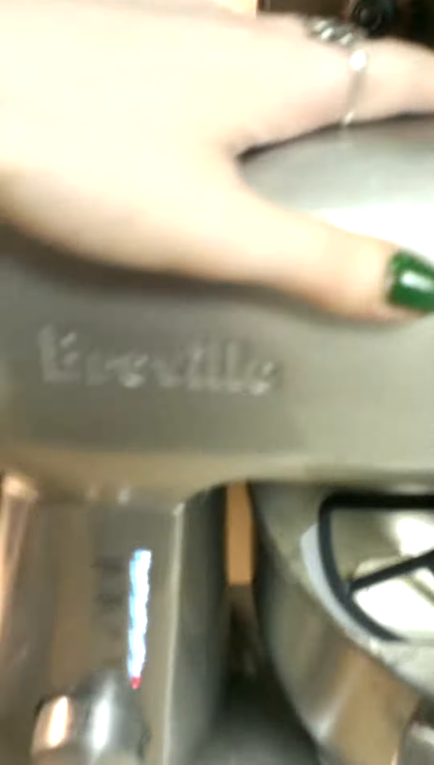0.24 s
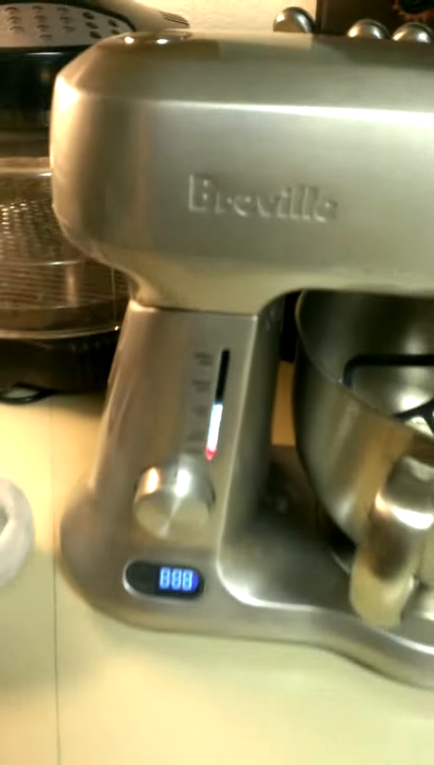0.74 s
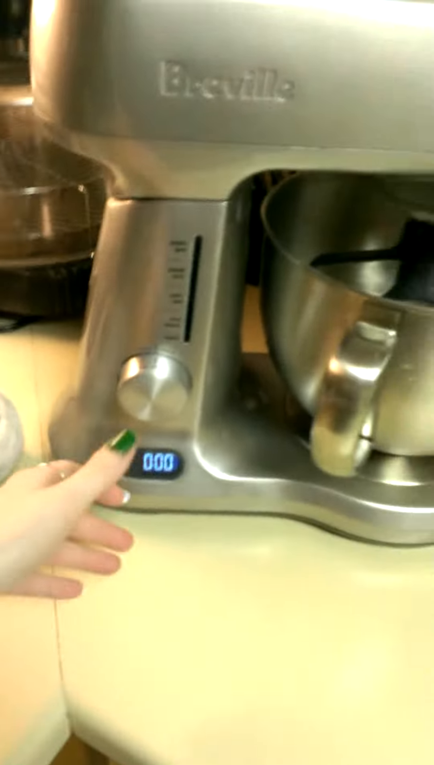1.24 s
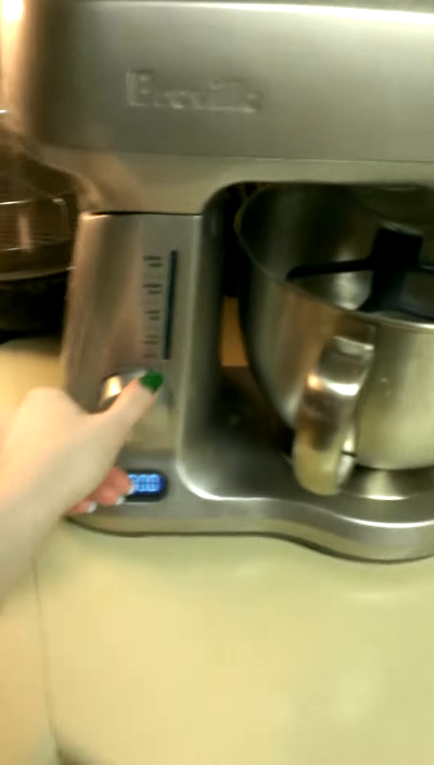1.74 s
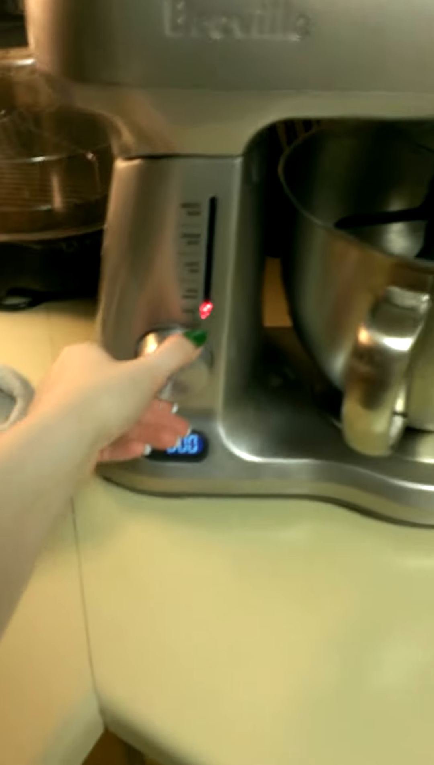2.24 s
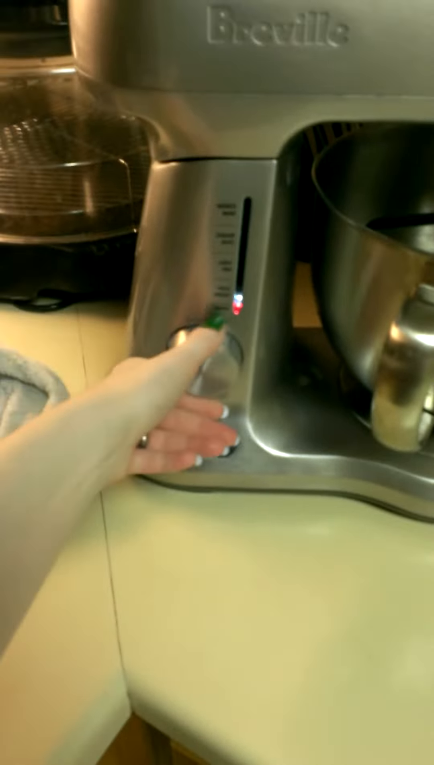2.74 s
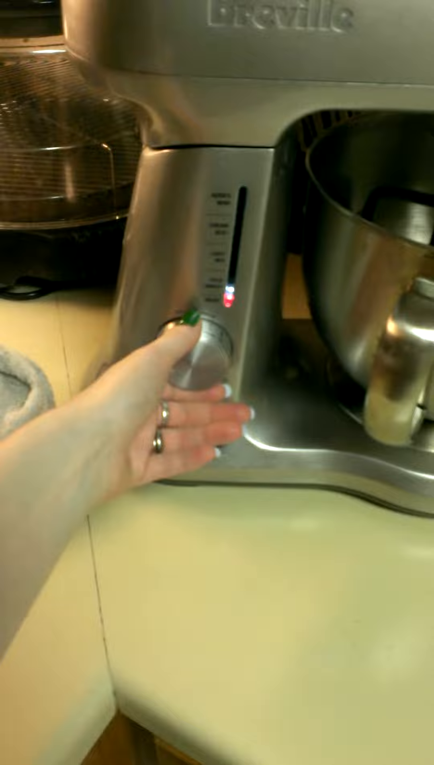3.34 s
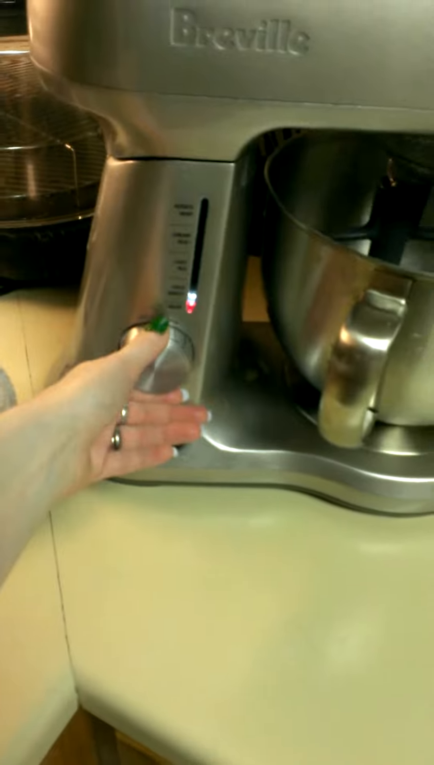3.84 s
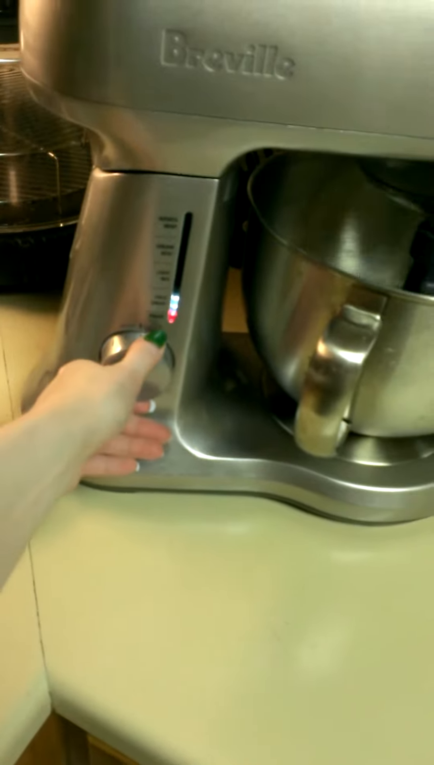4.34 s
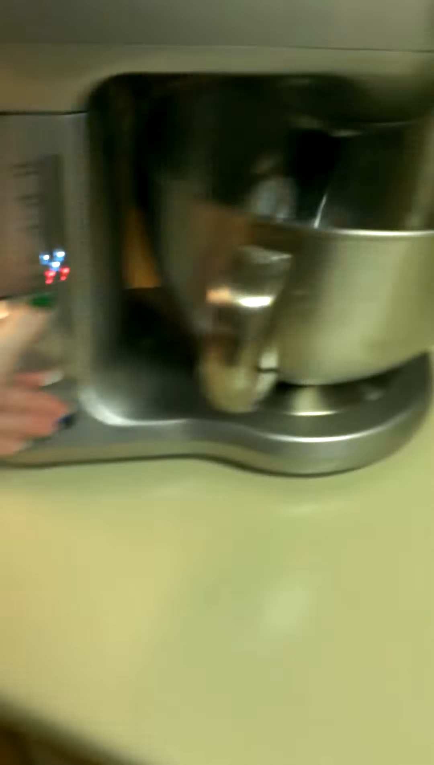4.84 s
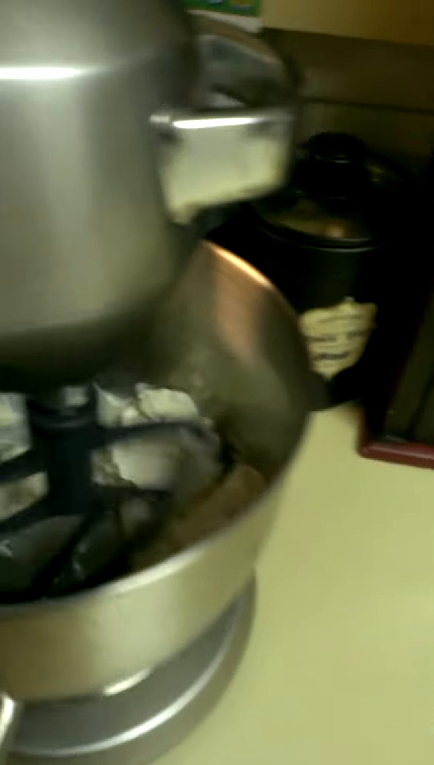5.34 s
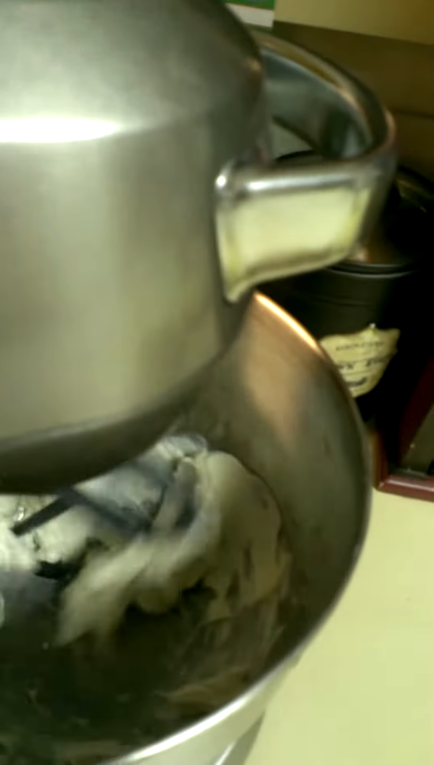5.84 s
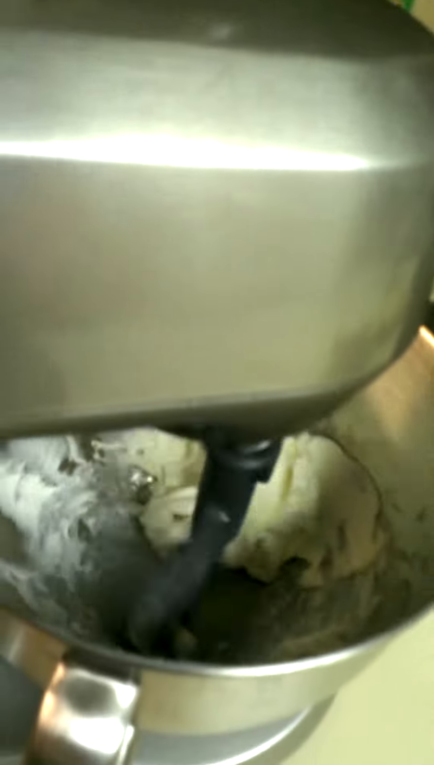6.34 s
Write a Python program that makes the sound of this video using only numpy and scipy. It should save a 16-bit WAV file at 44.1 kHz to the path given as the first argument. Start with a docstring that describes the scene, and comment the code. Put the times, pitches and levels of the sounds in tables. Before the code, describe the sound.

A stand mixer's head latches with a knock, its dial clicks, then the motor hums and whirs, slapping thick mixture around a steel bowl.

```python
"""Stand mixer with a steel bowl

The head latches with a knock and a hand turns the speed dial: impacts that excite damped modes.
The motor starts softly and hums at twice the mains frequency; its gears whirr louder with speed.
The beater churns and slaps a thick mixture and now and then rubs the bowl into resonance.
Two close microphones of unlike response and opposite polarity hear it in a small kitchen."""
import sys
import numpy as np
from scipy import signal
from scipy.fft import rfft, irfft, next_fast_len
from scipy.io import wavfile
from scipy.ndimage import uniform_filter1d

SR = 44100
rng = np.random.default_rng(int(sys.argv[2]) if len(sys.argv) > 2 else 0)


def int16_out(signal):
    """Quantize to a 16-bit WAV file."""
    q = np.round(np.clip(np.atleast_2d(signal).T, -1, 1) * 32767)
    wavfile.write(sys.argv[1], SR, q.astype(np.int16))


N = 290619
T = np.arange(N) / SR
HUM_HZ = 120  # twice the mains frequency
START_S, SPIN_UP_S = 2.82, 1.06  # onset and time constant of the shaft speed

# Levels in all tables are relative; each function sets the gain of its layer.
# gear case resonances, upper and lower: f/Hz, bandwidth/Hz, level/dB
CASE_MODES = [(2490, 270, 2), (2906, 70, 1), (3140, 80, -3), (3330, 130, -1.5), (3580, 80, 1.5)]
WHINE_MODES = [(735.5, 27, -3), (1130, 85, -7.5), (1390.5, 34, -1), (1638, 23, -1.5), (1980, 76, -1)]
# spectrum of the tooth rattle: f/Hz, level/dB
WHIRR_SPECTRUM = [(500, -17.5), (1400, -1), (2150, -17), (2600, 7.5), (3700, -1.5), (4300, -28),
                  (5500, -7.5), (8000, -28)]
def gears(churn_db):
    """Forced vibration: uneven tooth impacts drive the case, whose upper modes flare independently."""
    torque_db = 1.2 * walk(45)
    rattle = undb(2.12 * walk(320) + torque_db) * (1 + 0.048 * np.sin(2 * np.pi * HUM_HZ * T))
    teeth = field() * rattle
    case = unit(sum(resonate(teeth, [(hz, width, 0)]) * undb(db + 2 * walk(23))
                    for hz, width, db in CASE_MODES))
    whirr = undb(-2.5) * colour(field() * rattle, WHIRR_SPECTRUM) + undb(2) * case
    whirr_db = running_db(-43, speed_power=3.5, stroke_db=0.1, swell_share=1)
    return whirr * undb(whirr_db) + undb(churn_db - 0.5) * resonate(teeth, WHINE_MODES)


# spells of gear tone: start t/s, end t/s, f/Hz, level/dB, left minus right/dB, noise share of power
MESH_SPELLS = [(2.85, 4.357, 2008, -4, 13.5, 0.52), (3.497, 4.582, 1419, -3.5, 6.5, 0.54),
               (5.09, 6.7, 1991, 1.5, -5.5, 0.24), (5.65, 6.31, 734, -6, -4.5, .7),
               (5.92, 6.325, 1099, -2.5, 6, 0.65)]
def gear_tones(fade_s=0.061, chatter_hz=27, grit_width_hz=55, right_lag_s=0.00031):
    """Periodic tooth meshing gives wavering, gritty tones; their chatter weakens as the speed rises."""
    chatter_depth = 0.5 * np.sqrt(1 - rise(SPIN_UP_S))
    chatter = 1 + chatter_depth * np.sin(2 * np.pi * chatter_hz * np.cumsum(1 + 0.258 * walk(18)) / SR)
    tones = 0
    for start, end, hz, db, pan_db, rough in MESH_SPELLS:
        gate = np.clip(np.minimum(T - start, end - T) / fade_s, 0, 1)
        mesh_time = np.cumsum(1 + 0.009 * walk(110) + 0.006 * walk(16)) / SR
        tone = np.sqrt(2) * np.sin(2 * np.pi * hz * (mesh_time - np.array([[0], [right_lag_s]])))
        grit = resonate(field(), [(hz, grit_width_hz, 0)])
        grit = resonate(grit, [(hz, 2 * grit_width_hz, 0)])
        blend = np.sqrt(1 - rough) * tone + np.sqrt(rough) * grit
        tones += pan(pan_db) * gate * undb(db + 2 * walk(25)) * blend
    level_db = running_db(-48.5, speed_power=1, stroke_db=0.5, swell_share=0.59)
    current = rise(0.13)
    return tones * chatter * undb(level_db) * current


# hum partials: harmonic number, level/dB, share of each sag, change at full speed/dB
HUM_PARTIALS = [(1, -45, 0.52, 0), (2, -42.5, 1.0, .5), (3, -57, 0.41, 0.5), (4, -54.5, 0.73, -5.5),
                (6, -49, 0.85, -4), (7, -57.5, .5, -0.5)]
# the hum sags as the beater breaks free of the mixture: t/s, level/dB
HUM_SAGS = [(3.78, -4), (4.13, -6), (4.41, -15), (4.82, -3), (5.15, -5), (5.37, -26), (5.61, -3),
            (6.06, -1.5), (6.43, -13)]
def motor(waver_db=2.5, waver_rad=0.21, sag_half_s=0.04):
    """Magnetic forces of chopped mains current make the windings hum; partials waver more with speed."""
    speed, hum = rise(SPIN_UP_S), 0
    sag_db = sum(db * np.exp(-((T - t) / sag_half_s) ** 2) for t, db in HUM_SAGS)
    for k, db, sag_share, fast_db in HUM_PARTIALS:
        phase = 2 * np.pi * (k * HUM_HZ * T + rng.random()) + waver_rad * speed * walk(10)
        partial_db = db + sag_share * sag_db + speed * (fast_db + waver_db * walk(15))
        hum += undb(partial_db) * np.sin(phase)
    level_db = running_db(0.21, speed_power=0.096, stroke_db=0.13, swell_share=0.25)
    return np.sqrt(2) * hum * rise(0.31, start_s=2.7) * undb(level_db)


# spectrum of the churning: f/Hz, level/dB
CHURN_SPECTRUM = [(40, -37.5), (90, -2), (140, 8.5), (195, 0), (280, 2.5), (400, -3.5), (600, -2), (830, 1),
                  (1100, -5.5), (1400, -1), (2200, -2), (4000, -25.5)]
def churning(churn_db):
    """Unsteady viscous flow round the beater radiates low, fluctuating noise."""
    return colour(field(), CHURN_SPECTRUM) * undb(churn_db + 4 + 2 * walk(120))


# the mixture tears off the wall, and air pockets pop: t/s, level/dB
TEARS = [(4.95, -39.5), (5.74, -40.5), (6.22, -47)]
POPS = [(3.683, -36), (4.054, -32.5), (4.122, -35), (4.987, -26), (5.163, -29.5), (5.453, -35),
        (5.7666, -28), (5.805, -19.5), (5.8903, -24.5), (6.132, -23), (6.2196, -24), (6.247, -24),
        (6.5529, -28)]
# spectrum of both: f/Hz, level/dB
CRACKLE_SPECTRUM = [(1000, -46), (4500, 0.5), (7000, 6), (11000, 1.5)]
def crackling():
    """Rupture of sticky mixture and of air pockets releases bright bursts of noise."""
    running = undb(running_db(-49, speed_power=1.5, stroke_db=1.4, swell_share=0.2))
    tears = envelope((t, db, 0.036, 0.19) for t, db in TEARS)
    grain = unit(field() * undb(0.76 * walk(740) + 1.95 * walk(70)))
    pops = field() * envelope((t, db, 0.001, 0.026) for t, db in POPS)
    return colour(undb(6) * (running + tears) * grain + undb(0.5) * pops, CRACKLE_SPECTRUM)


# the beater slaps the mixture on the wall: t/s, smack level/dB, thud level/dB, smack T60/s
SLAPS = [(3.64, -39, -47.5, 0.084), (4.003, -58, -46.5, 0.063), (4.275, -39, -42.5, 0.2),
         (4.604, -42, -59, 0.2), (4.97, -34, -62, 0.09), (5.256, -29, -39.5, 0.068),
         (5.386, -52, -41.5, 0.028), (5.548, -30, -42, 0.048), (5.712, -36, -60, 0.025),
         (5.859, -44, -47, 0.032), (5.996, -35, -43.5, 0.16), (6.128, -32.5, -42.5, 0.18),
         (6.285, -33, -40.5, .12), (6.55, -48, -42.5, .1)]
# spectra of a wet smack and a soft thud: f/Hz, level/dB
SMACK_SPECTRUM = [(100, -13), (700, -5.5), (1600, -2), (3000, -0.5), (3900, 1), (4550, -6), (5500, -3.5),
                  (7500, -9), (11000, -15)]
THUD_SPECTRUM = [(50, -24), (100, -31), (145, -4.5), (195, -16), (270, -17.5), (380, -22.5), (800, -19.5),
                 (1800, -26.5), (5000, -64)]
def slaps():
    """Inelastic impact of a soft mass gives a bright smack and a slower, low thud."""
    smack = envelope((t, db + 4.5, 0.004, t60) for t, db, _, t60 in SLAPS) * undb(2 * walk(400))
    thud = envelope((t, db + 7, 0.016, 1.5 * t60) for t, _, db, t60 in SLAPS)
    return smack * colour(field(), SMACK_SPECTRUM) + thud * colour(field(), THUD_SPECTRUM)


# hollows close in the mixture: t/s, level/dB, initial f/Hz
PLOPS = [(3.622, -37, 684), (4.0, -38.5, 506), (4.05, -39, 311), (4.275, -30, 256.7), (5.25, -29, 461),
         (5.258, -35, 280.4), (5.277, -32, 155), (5.58, -30.5, 290), (5.85, -34, 496), (5.99, -39, 312),
         (6.139, -31.5, 157.5), (6.142, -34, 460), (6.278, -30, 304.4), (6.545, -28, 729)]
def plops(fall_per_s=2.3):
    """Cavity resonance: each closing hollow sounds a damped tone that sinks in pitch."""
    tones = 0
    for t, db, hz in PLOPS:
        sinking = np.exp(-fall_per_s * np.clip(T - t, 0, 1))
        phase = 2 * np.pi * (hz * np.cumsum(sinking) / SR + rng.random())
        tones += envelope([(t, db, 0.011, 0.08)]) * np.sin(phase)
    return tones * undb(2 * walk(200))


# the beater smears the mixture: t/s, level/dB, rise/s, T60/s
SMEARS = [(5.2, -37, 0.042, 0.23), (5.33, -36, 0.017, 0.099), (5.465, -33.5, 0.012, 0.085),
          (5.6, -44, 0.021, .12), (5.68, -33, 0.031, .08), (5.79, -31.5, 0.033, 0.2),
          (6.09, -32, 0.049, .13), (6.44, -31, 0.014, 0.14)]
# resonances of the smear: f/Hz, bandwidth/Hz, level/dB
SMEAR_MODES = [(2850, 120, 6), (3150, 80, 3), (3450, 140, -3), (3570, 110, 3)]
def smears():
    """Stick-slip friction of wet mixture along the wall makes an uneven rasp."""
    return resonate(field(), SMEAR_MODES) * envelope(SMEARS) * undb(2.5 * walk(160))


# the beater jolts on its shaft: t/s, level/dB, T60/s
JOLTS = [(3.6415, -32, .018), (3.647, -23.5, 0.029), (4.2941, -19.5, 0.027), (4.608, -34, 0.02),
         (4.939, -28, .03), (5.911, -18.5, 0.019), (6.133, -32, 0.032)]
# beater resonances: f/Hz, bandwidth/Hz, level/dB
BEATER_MODES = [(2640, 270, 0), (3110, 200, -13), (4110, 200, -2), (4460, 170, 3), (4700, 91, -11),
                (8900, 1500, -3.5)]
def beater():
    """Impulsive excitation: each jolt gives the beater a hard, short ring."""
    jolts = envelope((t, db - 3, 0.001, t60) for t, db, t60 in JOLTS)
    return pan(3.1) * resonate(field(), BEATER_MODES) * jolts


# the beater rubs the bowl: t/s, level/dB, contact time/s, T60/s, left minus right/dB
RUBS = [(.008, -41.5, 0.014, 0.19, -4), (4.266, -39.5, 0.011, 0.16, 8), (4.409, -44, 0.028, .3, 4),
        (4.51, -39, 0.028, 0.28, 4), (4.601, -31.5, 0.0069, 0.068, 15), (4.762, -29, 0.018, 0.066, 7.5),
        (5.55, -36, 0.0039, 0.16, -16.5), (5.843, -35, 0.014, 0.11, 6), (6.46, -40, 0.011, 0.1, 6)]
# resonances of the rasp: f/Hz, bandwidth/Hz, level/dB
RASP_MODES = [(1710, 120, 10), (1430, 210, -6), (1860, 510, -9), (2340, 270, 2)]
# the mixture squeaks on the steel: t/s, level/dB, f/Hz, rise/s
SQUEAKS = [(4.135, -51.5, 3340, 0.037), (4.32, -49, 3350, 0.0071)]
# the beater strikes the bowl: t/s, level/dB, knock above ring/dB
STRIKES = [(.007, -40.5, 5), (4.762, -33, 1), (5.3912, -22.5, -5.5)]
# bowl modes, damped by the mixture: f/Hz, level/dB, T60/s
BOWL_MODES = [(1520, -6.5, 0.023), (1656, -1, 0.041), (1920, -13, 0.012), (2522, -1, 0.085)]
# spectrum of the dull knock: f/Hz, level/dB
STRIKE_SPECTRUM = [(300, -8), (700, -18), (1100, -4.5), (1900, -4), (2600, 3), (5000, -33)]
def bowl(rubbed_hz=1617):
    """Uneven friction rasps, squeaks and builds up one bowl mode; an impact excites several."""
    rubbed = sum(ring([(rubbed_hz, 5.5, t60)], [(t, db, contact, pan_db)])
                 for t, db, contact, t60, pan_db in RUBS)
    rasp = resonate(field(), RASP_MODES) * envelope(rub[:4] for rub in RUBS)
    squeaks = sum(ring([(hz, 10, 0.1)], [(t, db, rise_s, 0)]) for t, db, hz, rise_s in SQUEAKS)
    clinks = ring(BOWL_MODES, [(t, db, 0.0015, 4) for t, db, _ in STRIKES])
    blows = envelope((t, db + knock_db, 0.0025, 0.022) for t, db, knock_db in STRIKES)
    knocks = colour(field(), STRIKE_SPECTRUM) * blows
    friction = undb(2 * walk(250))
    return (rubbed + squeaks) * friction + pan(2.8) * undb(0.5) * rasp + clinks + knocks


# the head locks down: t/s, level/dB
LATCH_KNOCKS = [(0.1351, -14.5), (0.1392, -15)]
# spectrum of the latch: f/Hz, level/dB
LATCH_SPECTRUM = [(60, -58), (220, -10), (600, -15), (1100, -7), (1800, 2.5), (2600, -4), (4200, -8),
                  (6000, -9.5), (8800, -7.5), (11000, -23)]
# modes of the cast head: f/Hz, level/dB, T60/s
HEAD_MODES = [(236, -17, 0.15), (330, -16, .1), (480, -18, .11), (755, -9, 0.034), (924, -8, 0.05),
              (1315, 5.5, 0.036), (1654, -4, 0.024), (1836, 6, .03), (1920, 3, .036), (2040, 4, 0.025),
              (2190, 2, .03), (2546, 2, 0.03), (3010, -6, 0.04), (3540, -3, 0.04), (4270, -9, .06),
              (8800, -4, 0.02)]
def head():
    """Free vibration after impact: the latch cracks and rattles, the head rings over a soft thump."""
    crack = colour(field(), LATCH_SPECTRUM) * envelope((t, db, 0.0013, 0.036) for t, db in LATCH_KNOCKS)
    t, db = max(LATCH_KNOCKS, key=lambda knock: knock[1])
    thump = colour(field(), THUD_SPECTRUM) * envelope([(t, db - 24, 0.016, 0.17)])
    rattle = colour(field(), LATCH_SPECTRUM) * envelope([(t, db - 11, 0.012, 0.17)])
    rattle *= undb(2 * walk(300))
    return pan(1.6) * (crack + rattle) + thump + ring(HEAD_MODES, [(t, db - 4.5, 0.0025, 5)])


# fingers and dial detents: t/s, level/dB, treble above body/dB, T60/s
CLICKS = [(0.007, -40, 11, 0.13), (.222, -41, -5, 0.26), (1.194, -51, 5, 0.064), (1.266, -52.5, 3, .05),
          (1.316, -46, 4, 0.035), (1.322, -49, 3.5, 0.44), (1.424, -47, 10, 0.097),
          (1.997, -54, 18.5, 0.31), (2.122, -45, 7.5, 0.49), (2.167, -40, -4, 0.037), (2.25, -48.5, 8, .05),
          (2.302, -47, 8, 0.19), (2.405, -48.5, 0, 0.11), (2.605, -49, 7, 0.36), (2.690, -39, 5, 0.086),
          (3.406, -36.5, -1.5, 0.41)]
# spectra of a click's body and treble: f/Hz, level/dB
CLICK_SPECTRUM = [(100, -14), (600, -4.5), (1500, -4), (2600, -6.5), (3700, 0.5), (4400, -1.5), (5500, -3),
                  (11000, -9.5)]
TREBLE_SPECTRUM = [(2000, -38), (5000, -3.5), (7000, 3), (10000, 1.5)]
def clicks():
    """Brief contacts of fingers and detents radiate broadband transients."""
    body = envelope((t, db, 0.0015, t60) for t, db, _, t60 in CLICKS)
    treble = envelope((t, db + bright_db, 0.001, t60) for t, db, bright_db, t60 in CLICKS)
    bursts = colour(field(), CLICK_SPECTRUM) * body + colour(field(), TREBLE_SPECTRUM) * treble
    return bursts * undb(-3 + 2 * walk(500))


# a fingernail touches the steel: t/s, level/dB
NAIL_TOUCHES = [(1.771, -37)]
# resonances of the steel: f/Hz, bandwidth/Hz, level/dB
STEEL_MODES = [(4730, 240, -16), (6470, 120, -6), (6980, 160, -1), (9700, 260, -15), (9780, 100, 5.5),
               (9700, 160, -4)]
def fingernail():
    """A light, hard contact excites the high modes of the steel."""
    return resonate(field(), STEEL_MODES) * envelope((t, db + 6, 0.001, 0.15) for t, db in NAIL_TOUCHES)


# scuffs and bumps of handling: t/s, level/dB, band f/Hz, rise/s, T60/s
SCUFFS = [(0.534, -47, 1200, 0.014, 0.68), (0.711, -42, 2520, 0.0071, 0.46),
          (1.375, -48.5, 1450, 0.045, 0.38), (1.992, -46.5, 2450, 0.0018, 0.57),
          (2.17, -51.5, 940, 0.02, 0.29), (2.454, -48, 2110, 0.0024, 0.55),
          (3.12, -43.5, 2220, 0.0096, 0.52), (3.411, -42.5, 2320, 0.012, 0.58),
          (3.81, -38.5, 1940, 0.073, 0.54)]
# response of the housing: f/Hz, gain/dB
HOUSING_RESPONSE = [(300, -1), (1900, 1), (2400, 7), (2900, 0.5), (4000, 0), (7000, 0), (11000, 1.5)]
def scuffs():
    """Sliding friction of the hand makes bands of noise, filtered by the resonant housing."""
    rubbing, size = np.zeros((2, N)), SR // 2
    for t, db, hz, rise_s, t60 in SCUFFS:
        bandpass = signal.butter(1, [hz / 1.83, hz * 1.46], "band", fs=SR, output="sos")
        band = unit(signal.sosfilt(bandpass, field(size)))
        first = int(t * SR)
        rubbing[:, first:first + size] += band * envelope([(0.00088, db, rise_s, t60)])[:size]
    return colour(rubbing * undb(2 * walk(300)), HOUSING_RESPONSE, keep_power=False)


# fingers tap the dial and the housing: t/s, level/dB, f/Hz, bandwidth/Hz, T60/s
FINGER_TAPS = [(2.166, -37.5, 3660, 900, 0.028), (2.454, -40.5, 2260, 160, .07)]
def taps():
    """Each tap excites one damped resonance of the knob or the housing."""
    return sum(resonate(field(), [(hz, width, 0)]) * envelope([(t, db, 0.001, t60)])
               for t, db, hz, width, t60 in FINGER_TAPS)


# spectrum of the room's rush: f/Hz, level/dB
AMBIENT_SPECTRUM = [(15, -10), (28, 13.5), (48, -13), (70, 1), (130, 3.5), (165, 1), (340, 2.5), (420, -5),
                    (1000, -6), (2300, -6), (4200, -11), (7000, -13), (11000, -24.5)]
def kitchen():
    """Ambient noise: a diffuse rush and a faint mains hum."""
    rush = colour(field(), AMBIENT_SPECTRUM) * undb(-53.5 + 1.03 * walk(14))
    return rush + undb(-58) * np.sin(2 * np.pi * HUM_HZ * T)


def room(x, wet_db, t60=0.23):
    """Reverberation: the reflections of a small hard room add an exponentially decaying tail."""
    tail = field(SR // 2) * envelope([(0.004, 0, 0.0041, t60)])[:SR // 2]
    return x + undb(wet_db) * convolve(x, tail / np.sqrt(np.sum(tail ** 2) / 2))


# swell as the mixture drags and the microphones swing over the bowl: t/s, level/dB
SWELL = [(3.6, 3), (3.7, 7), (3.77, 3), (4.1, 0), (4.4, 4.5), (4.58, 5), (4.7, -0.5), (4.87, 0), (5.05, 12),
         (5.19, 5.5), (5.35, 1.5), (5.53, 4), (5.62, 10.5), (5.9, 9), (5.94, 4.5), (6.1, 1.5), (6.3, 6),
         (6.4, 2.5), (6.48, 5.5)]
def running_db(full_db, speed_power, stroke_db, swell_share):
    """Level of a layer: a power law of shaft speed, modulated by the beater's load and the swell."""
    first_stroke_s, stroke_hz, creep_hz_per_s = 3.64, 3.117, 0.031
    age = T - first_stroke_s
    load = np.cos(2 * np.pi * (stroke_hz * age + creep_hz_per_s * age ** 2 / 2))
    speed_db = 20 * np.log10(rise(SPIN_UP_S))
    swell_db = np.interp(T, *np.transpose(SWELL))
    return full_db + speed_power * speed_db + stroke_db * load + swell_share * swell_db


def rise(time_s, start_s=START_S):
    """First-order step response, from rest towards one."""
    return 1 - np.exp(-np.maximum(T - start_s, 1e-5) / time_s)


def pulse(age, rise_s, t60):
    """Linear growth during contact, then exponential decay."""
    return np.minimum(age / rise_s, 1) * np.exp(-np.log(1000) * np.maximum(age - rise_s, 0) / t60)


def envelope(contacts):
    """Superposed pulses of contacts (t/s, level/dB, rise/s, T60/s)."""
    out, age = np.zeros(N + SR), T[:SR // 2]
    for start, db, rise_s, t60 in contacts:
        first = int(start * SR)
        out[first:first + len(age)] += undb(db) * pulse(age, rise_s, t60)
    return out[:N]


def ring(modes, blows):
    """Modal superposition: blows excite damped sines, a quarter cycle apart at the two microphones."""
    out, age = np.zeros((2, N + SR)), T[:SR // 4]
    for start, blow_db, rise_s, pan_db in blows:
        first = int(start * SR)
        for hz, db, t60 in modes:
            phase = rng.uniform(0, 2 * np.pi) + np.array([[0], [np.pi / 2]])
            mode = pulse(age, rise_s, t60) * np.sin(2 * np.pi * hz * age + phase)
            out[:, first:first + len(age)] += pan(pan_db) * undb(blow_db + db) * mode
    return out[:, :N]


def resonate(x, modes):
    """Forced response of parallel resonators (f/Hz, bandwidth/Hz, level/dB), at unit rms."""
    age = T[:SR // 8]
    response = sum(undb(db) * np.sqrt(width) * np.exp(-np.pi * width * age) * np.cos(2 * np.pi * hz * age)
                   for hz, width, db in modes)
    return unit(convolve(x, response))


def colour(x, points, keep_power=True, size=4096):
    """Minimum-phase filter through points (f/Hz, level/dB)."""
    hz, db = np.transpose(points)
    gain = undb(np.interp(np.log(np.fft.rfftfreq(size, 1 / SR) + 1), np.log(hz), db))
    cepstrum = irfft(np.log(unit(gain) if keep_power else gain))
    cepstrum[1:size // 2] *= 2
    cepstrum[size // 2 + 1:] = 0
    return convolve(x, irfft(np.exp(rfft(cepstrum))))


def field(size=N, coherent_hz=850):
    """Diffuse noise at two microphones: long waves reach both coherently."""
    length = next_fast_len(size)
    common, apart = rfft(rng.standard_normal((2, length)))
    coherence = 1 / (1 + (np.fft.rfftfreq(length, 1 / SR) / coherent_hz) ** 2) ** 2
    common *= np.sqrt((1 + coherence) / 2)
    apart *= np.sqrt((1 - coherence) / 2)
    return irfft(np.array([common + apart, common - apart]), length)[:, :size]


def walk(rate_hz):
    """Smooth random fluctuation of unit rms."""
    hold = int(SR / rate_hz)
    steps = np.repeat(rng.standard_normal(N // hold + 1), hold)
    return unit(uniform_filter1d(steps, hold)[:N])


def convolve(x, response):
    """Output of a linear system with this impulse response."""
    return signal.fftconvolve(np.atleast_2d(x), np.atleast_2d(response), axes=1)[:, :N]


def pan(db):
    """Left and right gains for a level difference."""
    return undb(np.array([[db], [-db]]) / 2)


def undb(db):
    """Decibels to amplitude ratio."""
    return 10 ** (np.asarray(db) / 20)


def unit(x):
    """Normalise to unit rms."""
    return x / np.sqrt(np.mean(x ** 2))


# churning and gear whine above their running level: t/s, level/dB
CHURN_SWELL = [(4.15, -4.5), (4.55, -0.5), (4.7, -1.5), (5.2, 0), (5.55, 1), (5.85, 3.5), (6.15, 1),
               (6.4, 1), (6.57, 1.5)]
def scene():
    """Superposition of handling, the running machine and the room."""
    churn_db = running_db(-44.5, speed_power=0.62, stroke_db=0.6, swell_share=0.0133)
    churn_db += np.interp(T, *np.transpose(CHURN_SWELL))
    machine = gears(churn_db) + gear_tones() + churning(churn_db) + crackling() + slaps()
    latch = room(head(), wet_db=-19)
    hand = clicks() + fingernail() + scuffs() + taps()
    contacts = bowl() + beater() + plops() + smears()
    return latch + room(hand + contacts + machine, wet_db=-11) + motor() + kitchen()


# microphone responses: f/Hz, gain/dB
LEFT_RESPONSE = [(60, 3.5), (250, 0.5), (450, 3), (750, -4), (1600, 0.5), (4300, 2.5), (5500, -7.5),
                 (7200, -18), (10500, -18)]
RIGHT_RESPONSE = [(40, -15), (100, 1), (250, 0.5), (450, 5), (750, 3), (1100, 0), (2100, -2.5), (3200, -6),
                  (4500, -3), (7500, -5.5), (8700, 2.5), (10400, -4)]
def record(dry, top_hz=10500):
    """Transduction: one microphone is dull, the other bright and inverted; peaks clip, the top is cut."""
    left = colour(dry[0], LEFT_RESPONSE, keep_power=False)
    right = -colour(dry[1], RIGHT_RESPONSE, keep_power=False)
    clipped = np.clip(np.vstack([left, right]), -0.8, 0.8)
    return signal.sosfilt(signal.ellip(10, 0.2, 70, top_hz, fs=SR, output="sos"), clipped)


dry = scene()
out = record(dry)
int16_out(out)
```